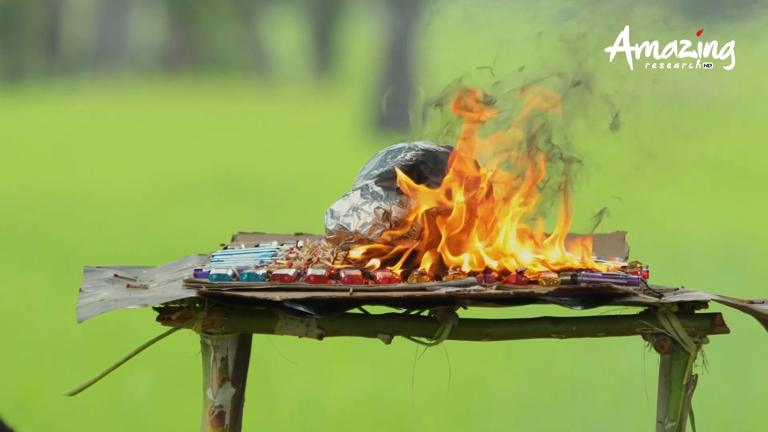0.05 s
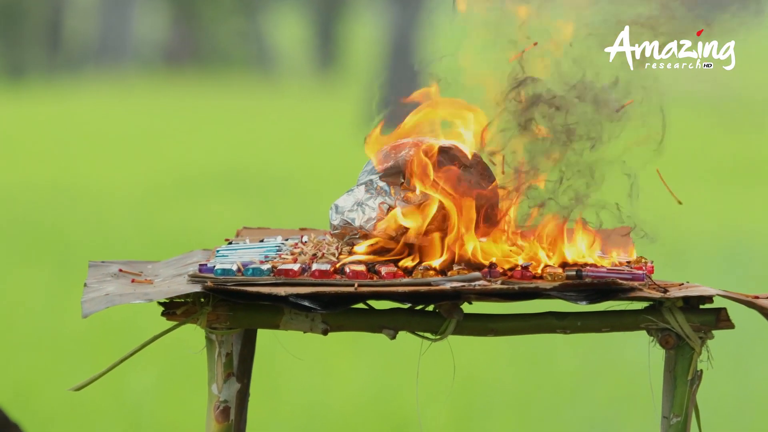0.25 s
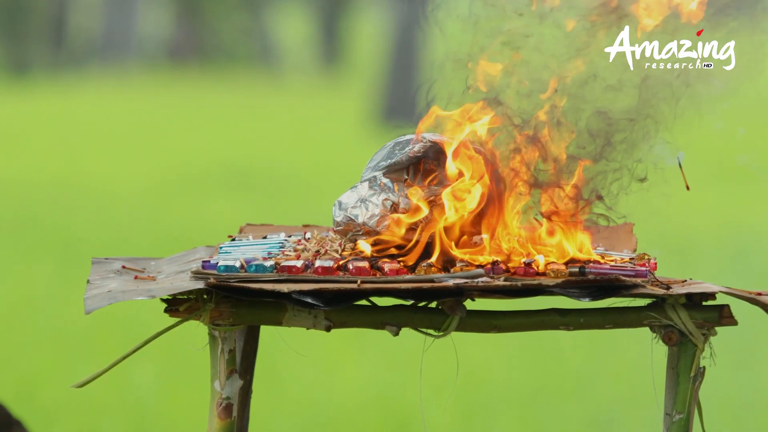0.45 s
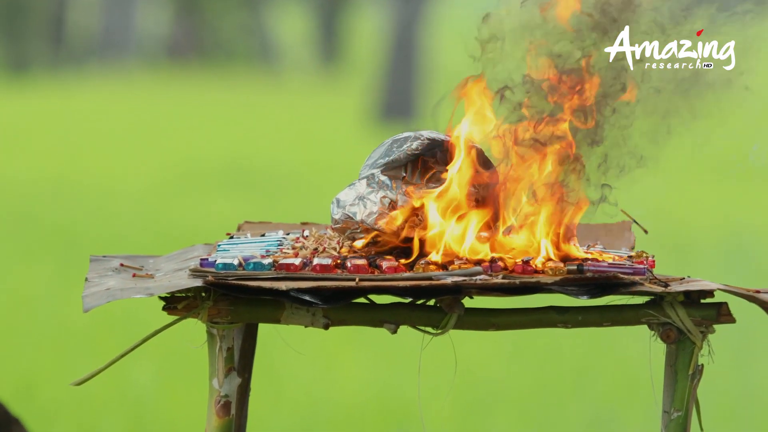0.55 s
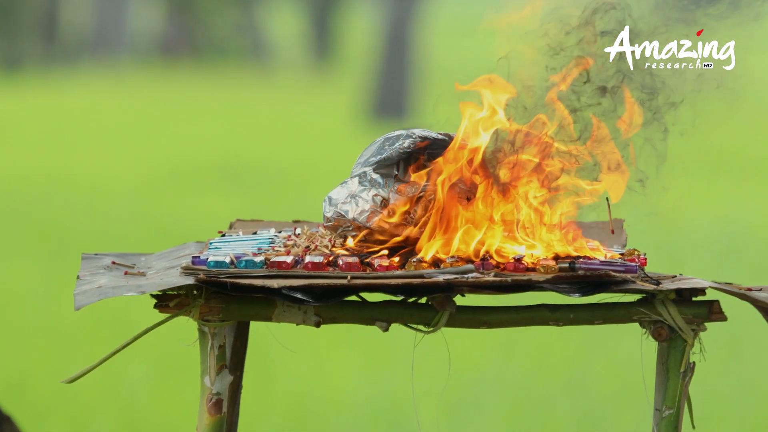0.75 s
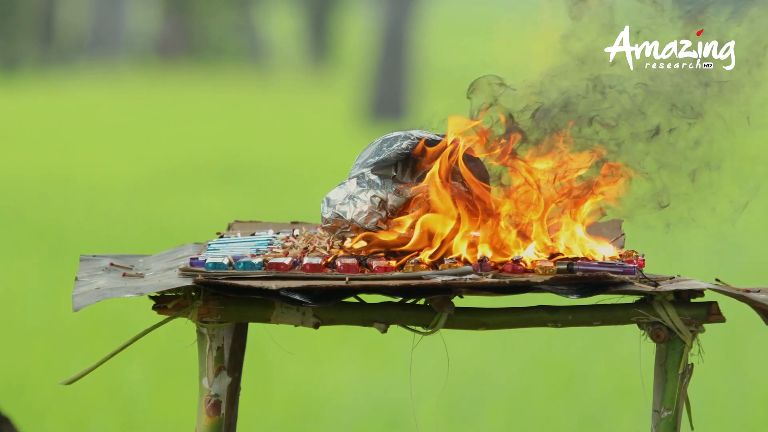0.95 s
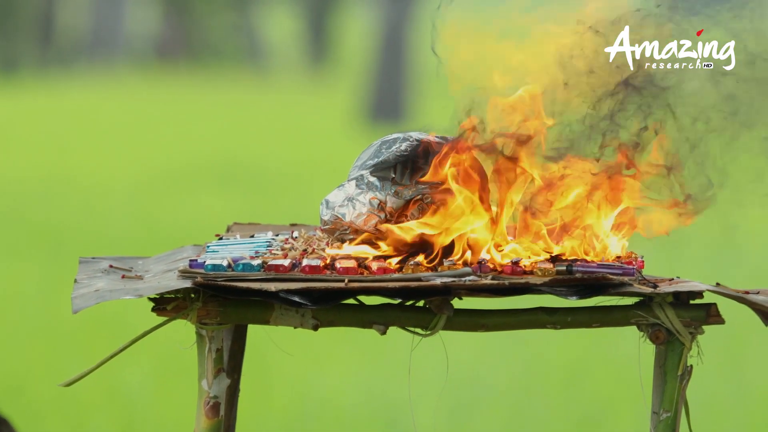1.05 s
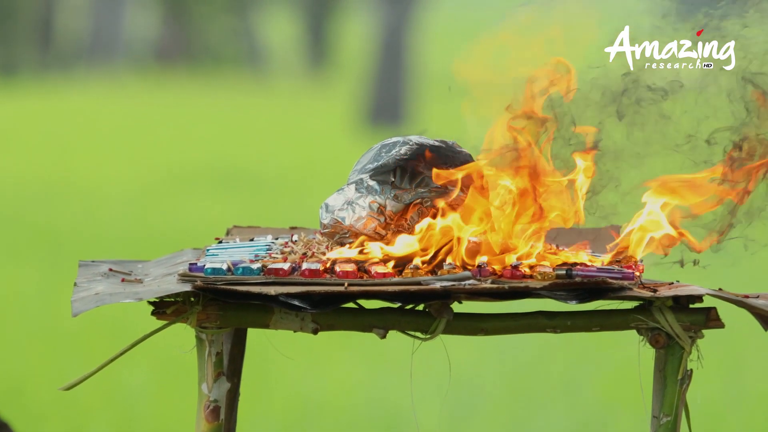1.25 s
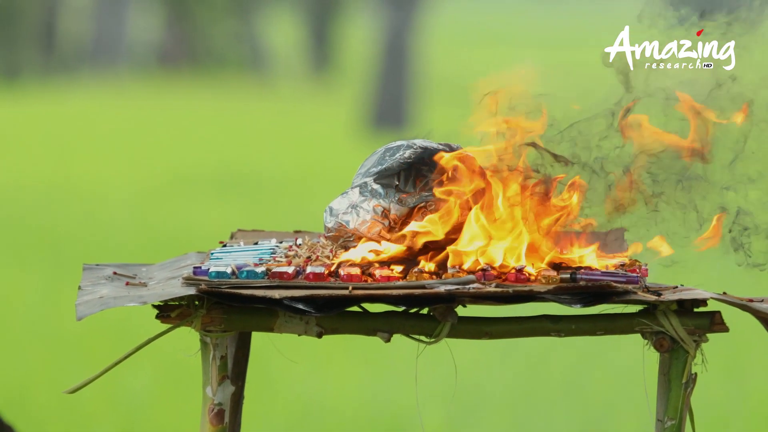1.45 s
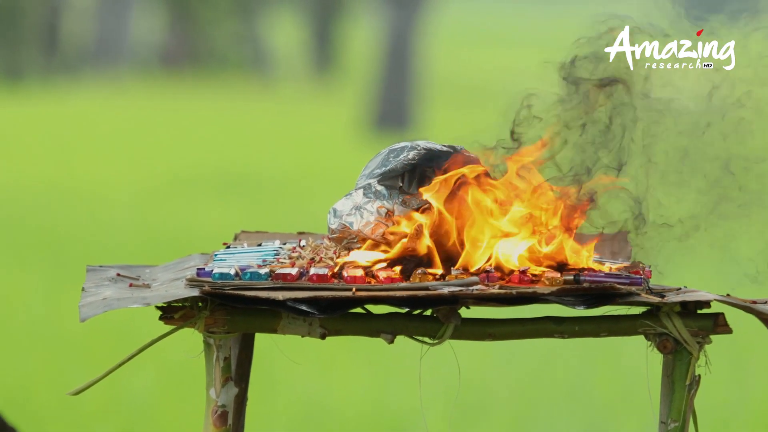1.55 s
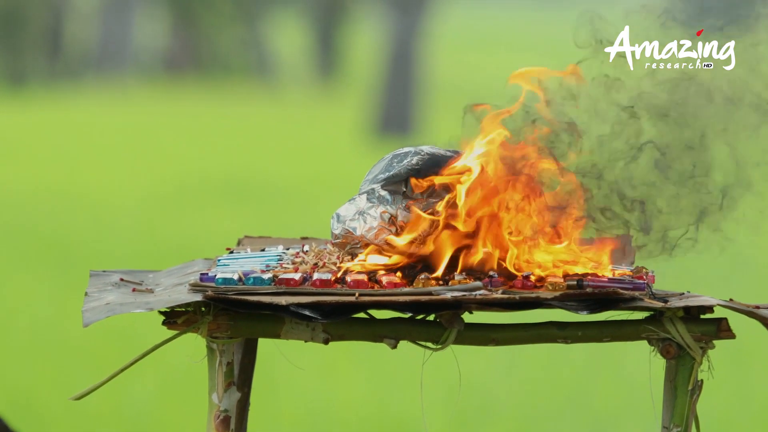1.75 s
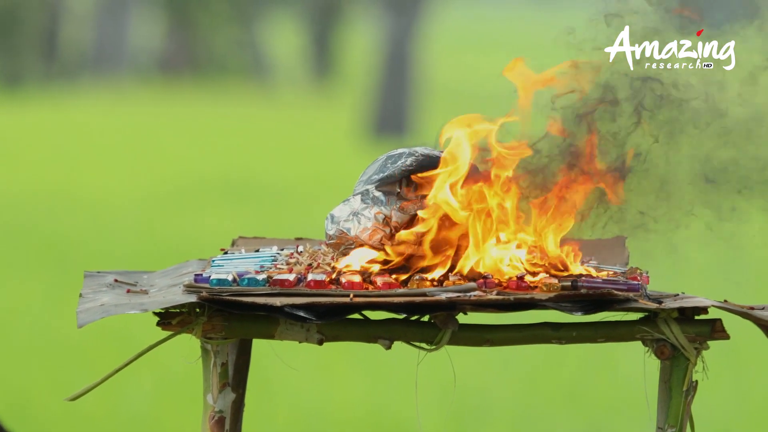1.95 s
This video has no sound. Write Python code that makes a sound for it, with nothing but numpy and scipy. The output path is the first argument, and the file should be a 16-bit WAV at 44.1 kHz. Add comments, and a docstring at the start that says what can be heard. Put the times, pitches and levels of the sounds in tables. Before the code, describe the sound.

Flames flare up from a heap burning on an outdoor table. A hiss of gas ignites into a fluttering, sputtering roar, a second jet follows with quick low puffs, and it dies back to a soft rush of fire.

```python
"""Burning gas jets roar as two lighters split open in turn in a heap alight on an outdoor table.
Each turbulent jet hisses, coloured by the resonances of its casing, then catches with a thump and
feeds a fluttering flame over a rumble of hot gas. As the gas runs out the flame breaks into separate
puffs, drops out and flares once more. Nearby surfaces add a brief scatter, and the low rush and
faint crackle of the fire lie under it all."""
import sys
import numpy as np
from scipy import signal
from scipy.fft import rfft, irfft
from scipy.io import wavfile

SR = 44100
rng = np.random.default_rng(int(sys.argv[2]) if len(sys.argv) > 2 else 0)


def wav_record(signal):
    """Record a signal, one row per channel, as 16-bit PCM in the file named by sys.argv[1]."""
    frames = np.transpose(np.atleast_2d(signal))
    bounded = np.clip(frames, -1, 1)
    # unit amplitude maps onto the largest positive 16-bit level
    quanta = np.round(bounded * 32767).astype(np.int16)
    wavfile.write(sys.argv[1], SR, quanta)


N = 88200
TIME, HZ = np.arange(N) / SR, np.fft.rfftfreq(N, 1 / SR)

# Left-right correlation of the fire, the flame and the hiss (f/Hz, coefficient)
BED_COHERENCE = [(100, 0.8), (300, 0.85), (500, 0.39), (700, 0.18), (1000, 0.63), (3000, 0.34),
                 (8000, 0.29)]
FLAME_COHERENCE = [(130, .994), (300, .975), (700, .945), (1400, .86), (3000, .68), (8000, .25)]
JET_COHERENCE = [(1000, 1), (3000, 0.3), (7000, 0.22), (15000, -0.18)]
# Stereo balance (f/Hz, left minus right level/dB)
BALANCE_DB = [(60, -1.5), (200, -.5), (380, -2.5), (700, -2), (1290, -3.5), (2380, -4), (4400, 0.5),
              (8120, -1), (15000, -2)]
# Spectra of the fire, hiss, thumps and rumble, puffs and flame (f/Hz, relative level/dB)
BED_SPECTRUM = [(25, -18), (75, -1), (120, -5), (280, 0), (420, -4), (540, -4.5), (600, 0), (680, -4.5),
                (720, -1), (800, -6), (1000, -13.5), (1300, -12), (2500, -17), (4200, -18.5), (8000, -25),
                (15000, -32)]
JET_SPECTRUM = [(300, 1), (1000, 0.5), (1600, -2), (3500, 1), (6500, -3.5), (8500, -4.5), (12000, -3),
                (15500, -2.5)]
THUMP_SPECTRUM = [(15, -28), (30, -24), (60, -6.5), (105, 4), (150, -11.5), (300, -59), (1000, -83)]
PUFF_SPECTRUM = [(30, -18), (100, -14.5), (160, 2), (212, 3), (255, -3), (298, -17.5), (335, -6.5),
                 (465, -22), (578, -9.5), (645, -26), (728, -9), (778, -23), (822, -11), (940, -30),
                 (1200, -22.5), (2000, -33), (4000, -41), (15000, -54)]
FLAME_SPECTRUM = [(25, -24), (60, -14.5), (110, 0), (145, -8.5), (205, 2), (255, -2), (298, -16.5),
                  (328, -5), (390, -14), (460, -20), (530, -12), (578, -3.5), (645, -14), (728, -5.5),
                  (778, -19.5), (822, -4.5), (862, -16.5), (895, -11), (935, -21), (1120, -22), (1190, -16),
                  (1265, -17), (1500, -25), (1610, -15), (1720, -24.5), (2500, -31), (5000, -39.5),
                  (15000, -56)]
# Reflection from the table and the ground (f/Hz, gain/dB)
SCATTER_GAIN = [(100, -26), (300, -46), (800, -20.5), (1500, -5.5), (4000, -6), (15000, -6)]
# Resonances of the split casings (f/Hz, width/Hz, gain/dB)
CASING_MODES = [(2110, 97, 6.5), (3960, 55, 9), (5390, 80, 6), (6750, 1500, 3), (12300, 60, 0)]
# Sputters in the jets (t/s, half length/s, level/dB, centre f/Hz, half width/octaves)
GAS_SPURTS = [(0.279, 0.027, -40, 3900, 0.3), (0.484, 0.032, -37.5, 5100, 0.9),
              (0.517, 0.017, -38.5, 5640, 1), (0.576, 0.0087, -34, 2450, 0.77),
              (.617, 0.017, -35, 3100, 0.86), (0.621, 0.03, -38, 9000, 0.92),
              (.685, 0.021, -42.5, 2100, 0.14), (0.734, .04, -46, 10500, 0.57),
              (0.757, 0.0034, -29, 2140, 0.33), (.758, .005, -38.5, 5300, .3),
              (.785, 0.0098, -36, 2220, 0.41), (0.818, 0.0099, -40.5, 3520, 0.85),
              (0.884, 0.006, -43.5, 5200, 0.48), (1.185, 0.025, -38.5, 3500, 0.9),
              (1.276, 0.021, -43.5, 3600, 0.88), (1.361, 0.041, -38, 2380, 0.86)]
# Escaping gas (start t/s, rise time/s, level/dB, decay rate/(dB/s))
GAS_JETS = [(0.167, 0.037, -33.5, 12), (1.137, 0.014, -38, 24.5)]
# Igniting gas pockets (t/s, half length/s, roar level/dB, thump level/dB, tilt/(dB/octave))
IGNITIONS = [(0.237, 0.0066, -22, -28.5, -3.5), (0.249, 0.0038, -18.5, -17, -1),
             (0.3, 0.0061, -35, -33, -1), (0.377, 0.0064, -28, -24.5, 1), (0.483, 0.0049, -30, -20.5, 2),
             (0.548, 0.01, -24.5, -25, 2), (0.675, 0.0096, -22, -39, -0.5), (0.842, 0.02, -28, -32, -0.5),
             (1.132, 0.0035, -22, -34, 0.5), (1.177, 0.0035, -14, -23, 0.5), (1.185, .004, -16.5, -16, 0.5),
             (1.23, 0.0041, -18, -22, -3.5), (1.244, 0.0056, -13, -29, 0), (1.259, 0.0054, -24, -29, 2.5),
             (1.279, 0.0044, -18.5, -22, 0.5), (1.302, 0.0061, -19.5, -13, 1.5),
             (1.336, 0.0066, -20, -19.5, 1), (1.349, 0.0054, -21, -24, -0.5),
             (1.367, 0.0027, -19.5, -19, 1), (1.394, 0.0055, -15.5, -16.5, -0.5),
             (1.444, 0.0078, -19, -33, -1), (1.473, 0.012, -20.5, -24.5, 1), (1.579, 0.0049, -18, -19, 0),
             (1.601, 0.012, -14.5, -27, -2.5)]
# Envelopes of the rumble and the flame (t/s, level/dB)
RUMBLE_ENVELOPE = [(.21, -80), (.28, -40), (.38, -36), (.5, -38), (.62, -40), (.76, -31), (.85, -42),
                   (1.13, -48), (1.2, -31), (1.3, -25), (1.38, -30), (1.49, -36), (1.54, -64)]
FLAME_ENVELOPE = [(.16, -61), (.22, -45), (.26, -25.5), (.3, -30.5), (.36, -25.5), (.6, -28.5), (.7, -25.5),
                  (.95, -25.5), (1.125, -23.5), (1.155, -38), (1.18, -27.5), (1.26, -24), (1.37, -29),
                  (1.44, -24.5), (1.49, -28.5), (1.53, -43), (1.565, -45), (1.62, -33.5), (1.68, -47.5),
                  (2, -67)]


def amp(db):
    """Amplitude ratio of a level in decibels."""
    return 10 ** (np.asarray(db) / 20)


def unit(x):
    """Normalisation to rms 1."""
    return x / np.sqrt(np.mean(x ** 2) + 1e-20)


def over_hz(points):
    """Interpolation of an (f/Hz, value) table on a logarithmic frequency axis."""
    hz, value = np.transpose(points)
    return np.interp(np.log(HZ + 1), np.log(hz), value)


def wander(rate_hz):
    """Band-limited random fluctuation of rms 1, rolling off above rate_hz."""
    spectrum = rfft(rng.standard_normal(N))
    return unit(irfft(spectrum * (HZ > rate_hz / 10) / (1 + (HZ / rate_hz) ** 4), N))


def turbulence(spectrum_db, coherence):
    """Shaped stereo noise of rms 1; the ratio of mid to side power sets the correlation."""
    mid, side = rfft(rng.standard_normal((2, N)))
    correlation = np.clip(over_hz(coherence), -1, 1)
    mid, side = mid * np.sqrt(1 + correlation), side * np.sqrt(1 - correlation)
    pan_db = over_hz(BALANCE_DB) / 2
    channels = np.array([(mid + side) * amp(pan_db), (mid - side) * amp(-pan_db)])
    return unit(irfft(channels * amp(spectrum_db), N))


def burst(noise, at, half_s):
    """Noise under a Gaussian envelope of standard deviation half_s, with rms 1 at the crest."""
    bell = np.exp(-((TIME - at) / half_s) ** 2 / 2)
    return unit(noise * bell) * np.sqrt(np.mean(bell ** 2))


def fire_bed(rush_db=-46, flicker_db=0.3, crackle_db=-65, crackles_per_s=77, decay_s=0.0008):
    """Combustion noise of the heap: a steady rush, with decaying crackles in a Poisson process."""
    rush = amp(rush_db) * turbulence(over_hz(BED_SPECTRUM), BED_COHERENCE)
    rush *= amp(flicker_db * wander(rate_hz=60))
    onsets = rng.random(N) < crackles_per_s / SR
    snaps = onsets * amp(5 * np.minimum(rng.exponential(1, N), 2))  # spread over 10 dB
    envelope = signal.lfilter([1], [1, -np.exp(-1 / (decay_s * SR))], snaps)
    crackle = envelope * turbulence(over_hz(JET_SPECTRUM), FLAME_COHERENCE)
    return rush + amp(crackle_db) * unit(crackle)


def scatter(x, t60_s=0.089):
    """Diffuse reflection from nearby surfaces: convolution with exponentially decaying noise."""
    tail = unit(turbulence(0, FLAME_COHERENCE) * amp(-60 * TIME / t60_s)) / np.sqrt(N)  # unit energy
    reflections = signal.fftconvolve(x, tail, axes=1)[:, :N]
    return irfft(rfft(reflections) * amp(over_hz(SCATTER_GAIN)), N)


def rumble():
    """Billowing hot gas radiates low-frequency noise that swells under each flame."""
    envelope = amp(np.interp(TIME, *np.transpose(RUMBLE_ENVELOPE)))
    return envelope * turbulence(over_hz(THUMP_SPECTRUM), FLAME_COHERENCE)


def casing_resonance_db():
    """Resonance of the split casings raises faint Lorentzian peaks in the hiss."""
    return sum(db / (1 + (2 * (HZ - hz) / width) ** 2) for hz, width, db in CASING_MODES)


def spurts(rough_db=0.5):
    """Sputtering gas radiates short bursts of band-limited jet noise."""
    out = np.zeros((2, N))
    roughness = amp(rough_db * wander(rate_hz=200))
    for at, half_s, db, hz, octaves in GAS_SPURTS:
        band_db = -10 * np.log10(1 + (np.log2((HZ + 1) / hz) / octaves) ** 6)
        hiss = turbulence(band_db + casing_resonance_db(), FLAME_COHERENCE)
        out += amp(db) * burst(hiss * roughness, at, half_s)
    return out


def sizzle(hiss, depth_db=2.5, width_hz=127, life_s=0.033, frame=512):
    """Random modulation in time and frequency gives the hiss short-lived patches of colour."""
    spectra = signal.stft(hiss, nperseg=frame)[2]
    across_hz = signal.windows.gaussian(21, width_hz * frame / SR / 2)
    along_time = signal.windows.gaussian(41, life_s * SR / frame)
    kernel = np.outer(across_hz, along_time)
    patches = unit(signal.fftconvolve(rng.standard_normal(spectra.shape[1:]), kernel, "same"))
    return unit(signal.istft(spectra * amp(depth_db * patches), nperseg=frame)[1][:, :N])


def jets(overshoot_db=4.5, overshoot_s=0.099, rough_db=2.04):
    """Jet noise rises fast, overshoots and fades as the pressure falls; the two jets add in power."""
    power = np.zeros(N)
    for start, rise_s, db, fade_db_per_s in GAS_JETS:
        age = np.maximum(TIME - start, 0)
        opening = np.minimum(age / rise_s, 1)
        level_db = db - fade_db_per_s * age + overshoot_db * np.exp(-(age / overshoot_s) ** 2)
        power += (opening * amp(level_db)) ** 2
    hiss = sizzle(turbulence(over_hz(JET_SPECTRUM) + casing_resonance_db(), JET_COHERENCE))
    return np.sqrt(power) * hiss * amp(rough_db * wander(rate_hz=250))


def puffs(pivot_hz=224):
    """Sudden ignition of a gas pocket radiates a short roar, dull or bright, over a low thump."""
    out = np.zeros((2, N))
    thump = turbulence(over_hz(THUMP_SPECTRUM), FLAME_COHERENCE)
    octaves_above = np.log2(np.maximum(HZ / pivot_hz, 1))
    for at, half_s, roar_db, thump_db, tilt in IGNITIONS:
        body = turbulence(over_hz(PUFF_SPECTRUM) + tilt * octaves_above, FLAME_COHERENCE)
        out += amp(roar_db) * burst(body, at, half_s) + amp(thump_db) * burst(thump, at, half_s)
    return out


def roar(flutter_db=1):
    """Turbulent combustion of the jets: a hollow roar whose amplitude modulation is heard as flutter."""
    envelope = amp(np.interp(TIME, *np.transpose(FLAME_ENVELOPE)))
    flutter = amp(flutter_db * wander(rate_hz=67))
    return envelope * unit(turbulence(over_hz(FLAME_SPECTRUM), FLAME_COHERENCE) * flutter)


def scene():
    """Superposition of the flaring gas, its reflections and the fire in the open air."""
    flare = jets() + spurts() + roar() + puffs() + rumble()
    return flare + scatter(flare) + fire_bed()


def record(dry, cutoff_hz=15850):
    """A linear-phase low-pass filter limits the bandwidth."""
    lowpass = signal.firwin(511, cutoff_hz, window=("kaiser", 9), fs=SR)
    return signal.oaconvolve(dry, lowpass[None], "same")


dry = scene()
out = record(dry)
wav_record(out)
```